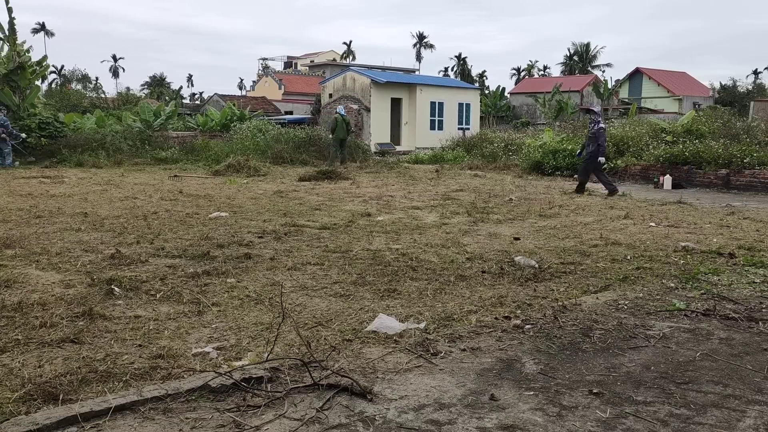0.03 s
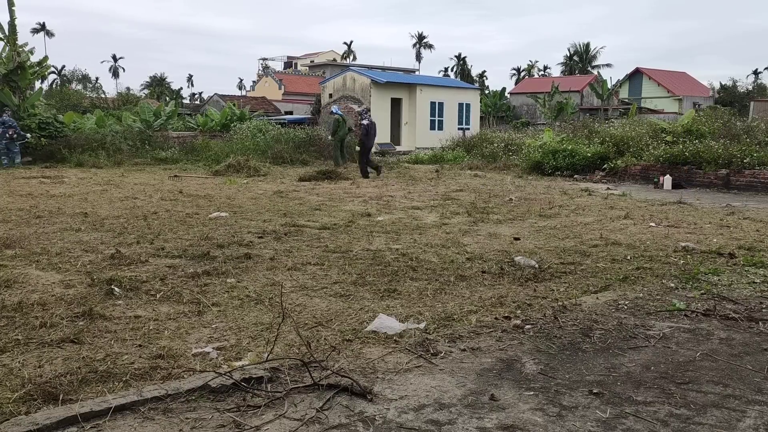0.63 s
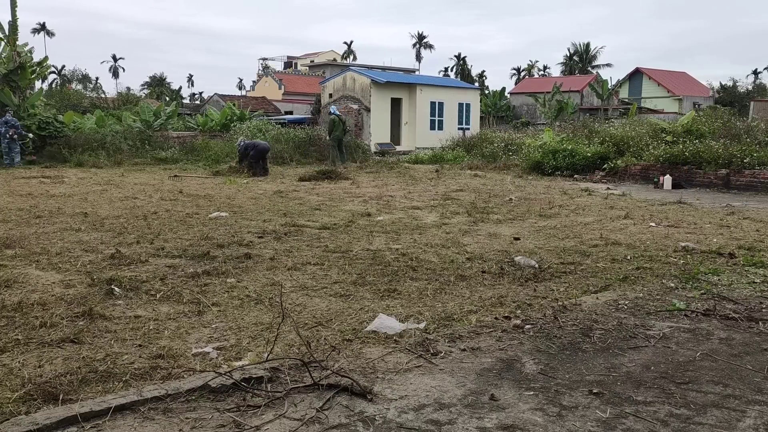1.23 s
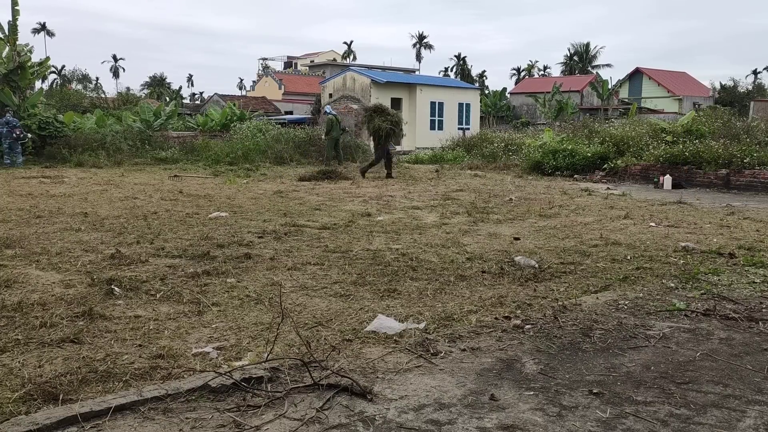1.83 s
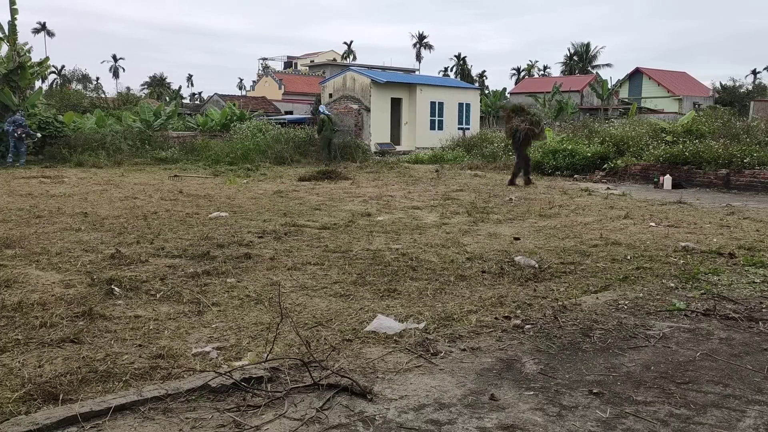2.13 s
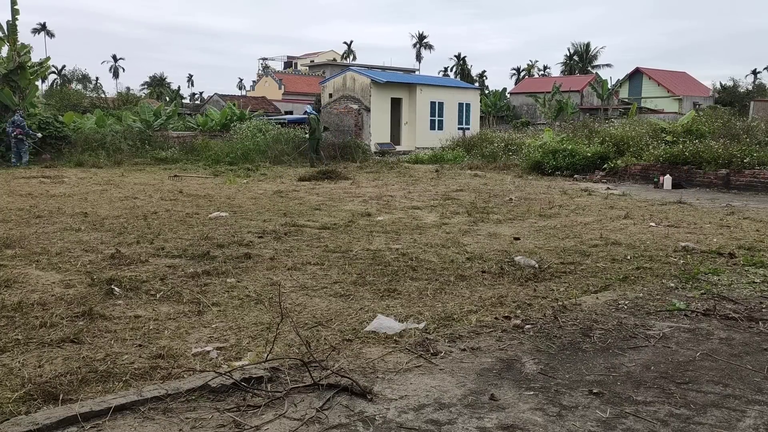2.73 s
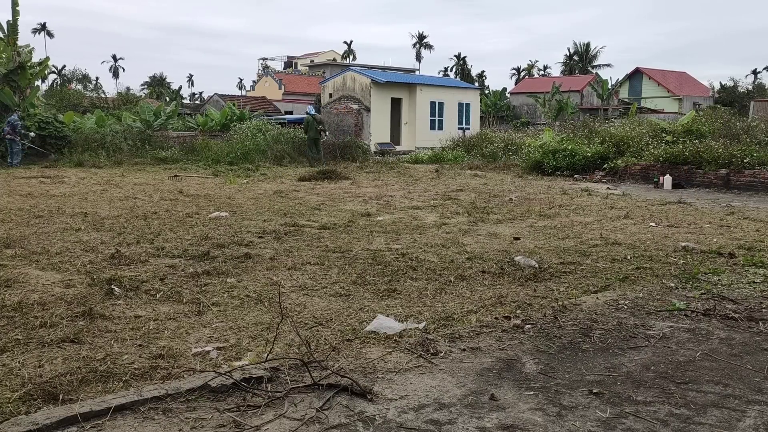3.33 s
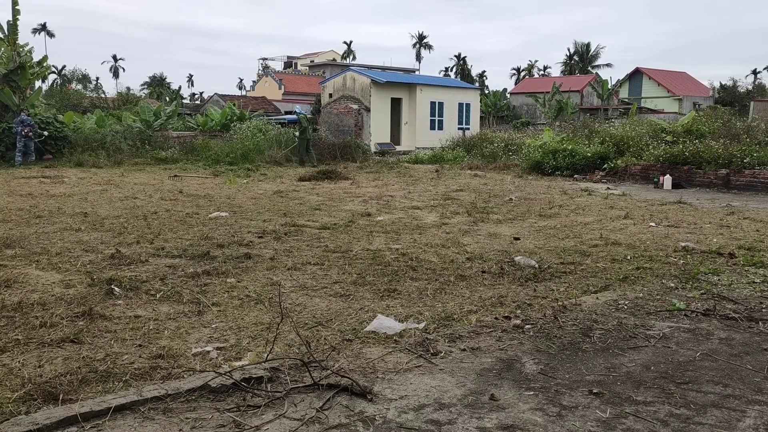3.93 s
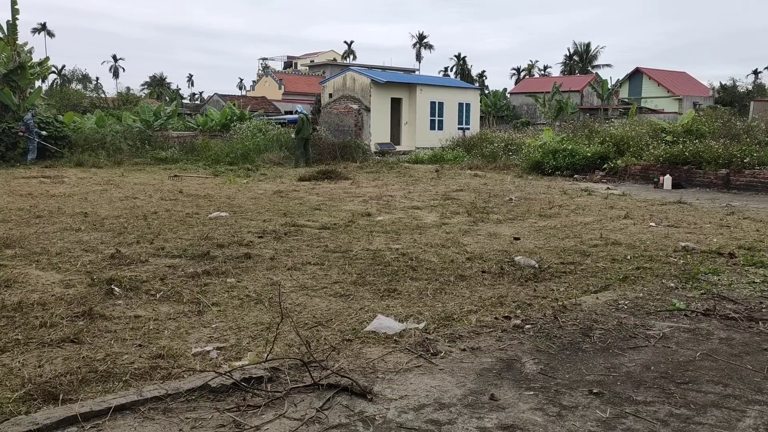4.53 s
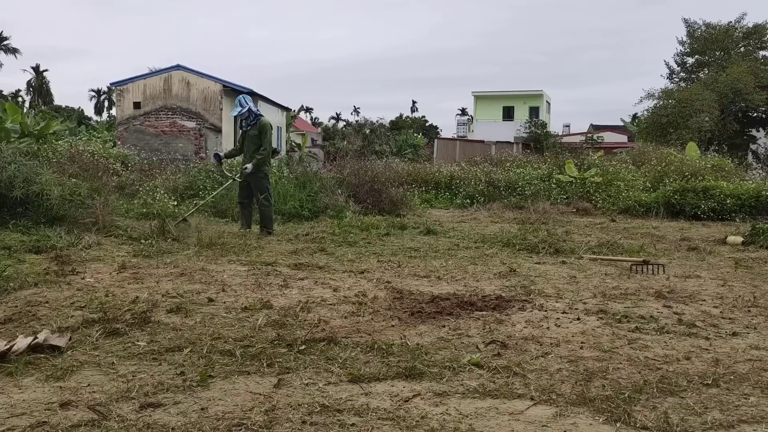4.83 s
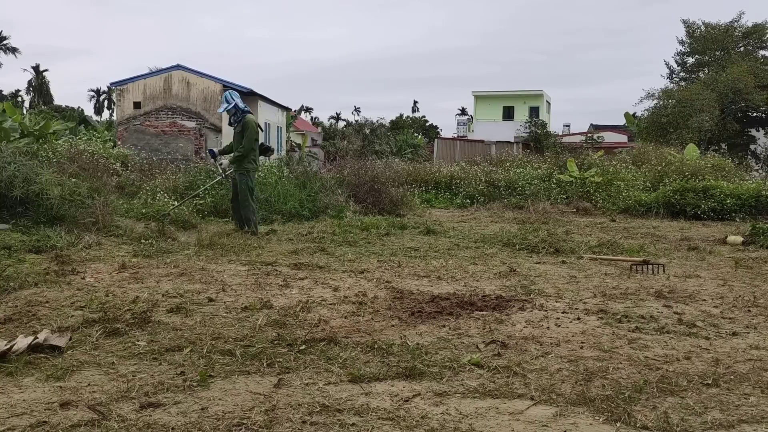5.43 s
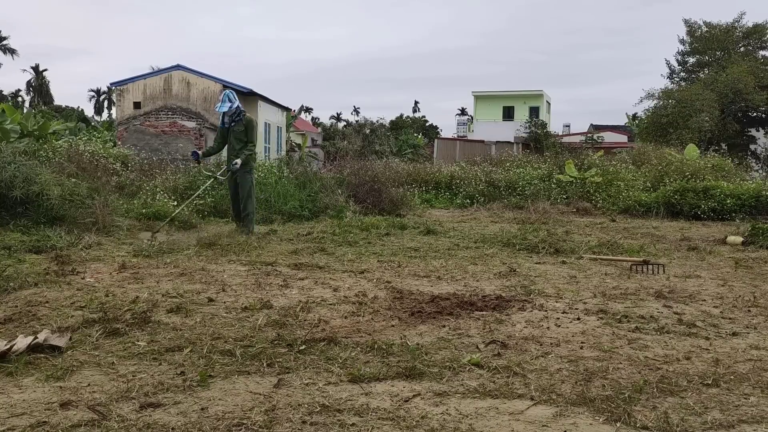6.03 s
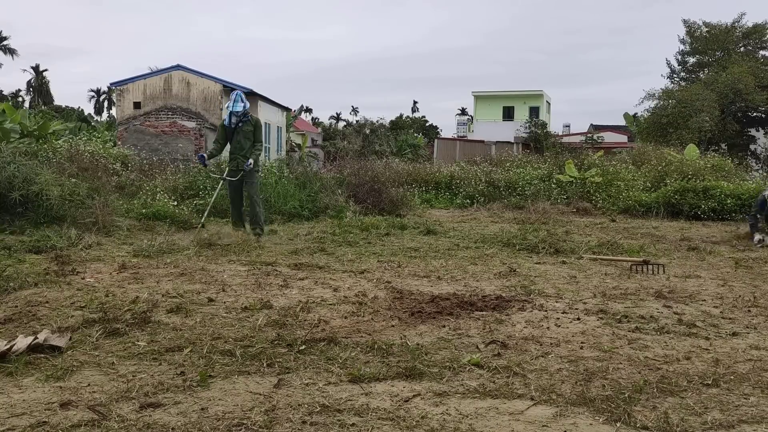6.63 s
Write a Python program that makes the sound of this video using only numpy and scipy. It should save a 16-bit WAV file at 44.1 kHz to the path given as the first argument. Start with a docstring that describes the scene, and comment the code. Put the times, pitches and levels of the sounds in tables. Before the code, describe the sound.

On an open outdoor lot, several petrol brush cutters whine at a distance, one sagging in pitch as it bites into grass, another revving in short blips. Grass swishes under a fine hiss, and light wind bumps the microphone. About two thirds through, a close engine buzz cuts in, loud and bright, then fades to a muffled drone and steps up into a higher, wavering whine.

```python
"""Petrol brush cutters work through tall grass on an open lot, each a train of firing pulses filtered by
resonances. One bogs down whenever its blade bites; another is blipped up for every sweep; two more run
far away. Later the listener stands by a close engine buzz, loud and bright at first, soon sounding
muffled; its low drone gives way to a higher, wavering engine whine, and a distant whine comes in blips.
Grass swishes, a fine hiss lies over all, wind bumps the microphone; there is a knock and a tiny squeak."""
import sys
import numpy as np
from scipy import signal
from scipy.fft import rfft, irfft
from scipy.io import wavfile
from scipy.ndimage import uniform_filter1d, map_coordinates

SR = 44100
rng = np.random.default_rng(int(sys.argv[2]) if len(sys.argv) > 2 else 0)


def file_out(sig):
    """Save sig as 16-bit WAV at sys.argv[1]."""
    # one column per channel
    cols = np.atleast_2d(sig).T
    # limit, then scale
    lim = np.clip(cols, -1, 1)
    pcm = np.round(lim * 32767).astype(np.int16)
    wavfile.write(sys.argv[1], SR, pcm)


N = 294588
TIME = np.arange(N) / SR
FREQS = np.fft.rfftfreq(N, 1 / SR)
MOVE_S = 4.714   # from here on the listener stands by the close engine buzz

# spectrum of the hiss and gas noise at the second spot: (frequency [Hz], relative density [dB])
NEAR_HISS_SPECTRUM = [(1000, -16.5), (3500, -3), (5200, -4.5), (7000, 4.5), (8200, 1), (9500, 3),
                      (12000, 2.5), (15500, -1)]


def from_db(db):
    """Amplitude ratio: a factor of ten for every 20 dB."""
    return 10 ** (np.asarray(db) / 20)


def rms_one(x):
    """Normalisation to unit mean power."""
    return x / np.sqrt(np.mean(x ** 2) + 1e-20)


def over_time(points):
    """Linear interpolation of a table in time."""
    return np.interp(TIME, *np.transpose(points))


def over_hz(points):
    """Linear interpolation of a table in log frequency."""
    hz, value = np.transpose(points)
    return np.interp(np.log(FREQS + 1), np.log(hz), value)


def drift(rate_hz):
    """Random modulation: low-pass noise of unit rms with its corner at rate_hz."""
    pole = np.exp(-40 * np.pi * rate_hz / SR)
    white = rng.standard_normal(N // 20 + 4002)
    slow = signal.lfilter([1], [1, -2 * pole, pole * pole], white)[4000:]
    return np.interp(np.arange(N) / 20, np.arange(len(slow)), rms_one(slow))


def swell(peak_s, rise_s, fall_s):
    """Envelope of unit height, between a pointed exponential and a round Gaussian."""
    width_s = np.where(TIME < peak_s, rise_s, fall_s)
    return np.exp(-(np.abs(TIME - peak_s) / width_s) ** 1.5)


def noise(spectrum, correlation):
    """Partly coherent stereo noise: the balance of mid and side sets the left-right correlation."""
    mid, side = rfft(rng.standard_normal((2, N))) * from_db(over_hz(spectrum))
    alike = np.clip(over_hz(correlation), -.95, .95)
    pair = irfft(np.sqrt(1 + alike) * mid + np.sqrt(1 - alike) * side * [[1], [-1]], N)
    return pair / pair.mean(0).std()


def firings(rate_hz, wobble, rough, whine=()):
    """One pulse per firing gives a harmonic series; whine lifts some orders: (order, lift [dB])."""
    rate_hz = rate_hz * (1 + wobble * drift(39.97))
    half_phase = np.pi * (np.cumsum(rate_hz) / SR % 1) + 1e-9
    harmonics = np.floor(SR / 2 / rate_hz.max())
    pulses = np.sin((2 * harmonics + 1) * half_phase) / np.sin(half_phase) - 1
    for order, lift_db in whine:
        pulses += (from_db(lift_db) - 1) * 2 * np.cos(2 * order * half_phase)
    return rms_one(pulses * (1 + rough * drift(81)))


def dispersion(x, spread_s):
    """Grass and bushes spread each pulse: the group delay grows by spread_s per kHz."""
    return irfft(rfft(x) * np.exp(-1j * np.pi * spread_s * FREQS ** 2 / 1000), N)


def ground_echo(x, strength, lag_s, swing=0.24):
    """Comb filtering: the ground reflection shifts as the tool swings, so each harmonic flutters."""
    delay = SR * lag_s * np.exp(swing * drift(5))
    reflected = map_coordinates(x, [np.arange(N) - delay], order=3)
    return (x + strength * reflected) / np.hypot(1, strength)


def exhaust(pulses, response, level_db):
    """Resonance: pulses ring in exhaust and housing, a minimum-phase filter; the rms follows level_db."""
    cepstrum = irfft(np.log(from_db(over_hz(response))), N)
    causal_fold = 1 + np.sign(np.fft.fftfreq(N))
    tone = irfft(rfft(pulses) * np.exp(rfft(cepstrum * causal_fold)), N)
    running_rms = np.sqrt(uniform_filter1d(tone ** 2, SR // 30) + 1e-12)
    return from_db(level_db) * tone / running_rms


def distant_tone(rate_hz, level_db, response, wobble, flutter_db, whine=()):
    """Source and filter at a distance: an engine tone whose level flutters quickly."""
    pulses = dispersion(firings(rate_hz, wobble, rough=.05, whine=whine), spread_s=.0009)
    arriving = ground_echo(pulses, strength=0.42, lag_s=0.000689)
    return exhaust(arriving, response, level_db + flutter_db * drift(45))


def lead_cutter(treble_gain_db):
    """Load slows an engine at open throttle: each bite drags the pitch down, then it recovers."""
    # running free: (time [s], firing rate [Hz], level [dB])
    free_running = [(0.0, 419.2, -52), (0.06, 472.1, -50), (0.29, 481.9, -48.5), (0.88, 488.6, -50),
                    (1.4, 517.8, -50.0), (2.1, 482.4, -49.5), (2.8, 502.9, -51), (3.43, 523.3, -50.5),
                    (4.13, 528, -51.5), (4.42, 563.5, -49), (4.7, 484.5, -50)]
    # bites into the grass: (deepest sag [s], bogging [s], recovery [s], rate step [Hz], level step [dB])
    bites = [(0.088, 0.013, 0.043, -96, -6.5), (0.213, 0.04, 0.045, -28, -3),
             (0.334, 0.013, 0.02, -55, -2.5), (0.385, 0.031, 0.059, -97, -7),
             (0.539, 0.047, 0.103, -78, -5), (0.709, 0.00668, 0.077, -34, 0.7),
             (0.772, 0.012, 0.097, -93, -6), (0.971, 0.06, 0.038, -66, -3), (1.025, 0.051, 0.085, -120, -5),
             (1.161, 0.013, 0.093, -21, -1.3), (1.315, 0.035, 0.03, -85, 0), (1.477, 0.0151, 0.058, -36, 0),
             (1.569, 0.028, 0.08, -138, -4.5), (1.679, 0.025, 0.12, -47, -1), (1.809, 0.02, 0.042, -52, -2),
             (2.007, 0.013, 0.029, -21.5, -1.5), (2.131, 0.0078, 0.041, -88.5, -7),
             (2.264, 0.028, 0.076, -117, -8.5), (2.403, 0.00811, 0.066, -58.5, -5),
             (2.56, 0.01, 0.059, -75, -6), (2.619, 0.072, 0.042, -102, -10.5),
             (2.712, 0.01115, 0.073, -33, 2), (2.861, 0.016, 0.03, -98.5, -1),
             (2.918, 0.051, 0.083, -82, -4.4), (3.013, 0.044, 0.093, -54, -0.5),
             (3.156, 0.019, 0.062, -94, -3.5), (3.193, 0.014, 0.04, -59.5, -2.5),
             (3.246, 0.021, 0.079, -65, -3), (3.535, 0.042, 0.037, -34.5, 1.2),
             (3.689, 0.015, 0.033, -109, 0), (3.763, 0.073, 0.065, -100, -5.5),
             (3.813, 0.016, 0.044, -62.5, -1), (3.917, 0.011, 0.074, -159, -3.5),
             (4.259, 0.067, 0.097, -69, 1), (4.494, 0.041, 0.097, -90, -3.5)]
    # exhaust and housing: (frequency [Hz], gain [dB])
    response = [(400, -10.5), (465, -4.5), (530, -9.5), (900, -7), (1110, -5), (1250, -31), (1500, -20.5),
                (1780, -9), (2400, -7.5), (2850, -16), (3300, -9.5), (3700, -19.5), (4450, -18.5),
                (5200, -20), (6200, -32.5)]
    # whining harmonics: (order, lift [dB])
    whine = [(4, 7), (5, 10), (9, 5)]
    # the treble comes and goes as the machine swings round: (time [s], relative lift [dB])
    treble_lift = [(0.2, -5.5), (0.45, -0.5), (0.7, -1), (0.9, 4.5), (1.1, -0.5), (2.1, -5.5), (2.4, 1.5),
                   (4.7, 0.5)]
    times, *columns = np.transpose(free_running)
    rate_hz, level_db = (np.interp(TIME, times, column) for column in columns)
    for sag_s, bogging_s, recovery_s, step_hz, step_db in bites:
        load = swell(sag_s, bogging_s, recovery_s)
        rate_hz += step_hz * load
        level_db += step_db * load
    rate_hz *= 1 + .0045 * drift(34)   # single stems tug at the speed
    tone = distant_tone(rate_hz, level_db, response, wobble=.003, flutter_db=1.1, whine=whine)
    tone *= 1 + .13 * drift(130)   # and roughen the tone
    treble = irfft(rfft(tone) * np.interp(FREQS, [3400, 4000], [0, 1]), N)
    return tone + (from_db(over_time(treble_lift) + treble_gain_db) - 1) * treble


def blipped_engines():
    """Pitch and level modulation in short blips: the sweeping cutter, and a distant engine whine."""
    # throttle blips: (peak time [s], run-up [s], run-down [s], rate gained [Hz])
    blips = [(0.348, 0.05, 0.046, 93.5), (0.437, 0.048, 0.061, 117.6), (0.647, 0.093, 0.035, 86),
             (0.871, 0.043, 0.098, 100.5), (1.051, 0.045, 0.052, 94.4), (1.188, 0.077, 0.052, 110.1),
             (1.291, 0.045, 0.019, 57.83), (1.454, 0.042, 0.015, 55.1), (1.569, 0.072, 0.068, 79.9),
             (1.752, 0.102, 0.031, 150.7), (1.828, 0.038, 0.094, 98.7), (2.038, 0.157, 0.021, 154.2),
             (2.152, 0.07, 0.044, 104.6), (2.276, 0.061, 0.024, 121.5), (2.487, 0.065, 0.084, 131.4),
             (2.723, 0.125, 0.052, 135.9), (2.951, 0.069, 0.17, 92.9), (3.194, 0.168, 0.032, 166),
             (3.396, 0.07, 0.037, 88.7), (3.641, 0.081, 0.033, 137.8), (3.779, 0.051, 0.061, 107.5),
             (3.87, 0.055, 0.017, 115.9), (4.186, 0.105, 0.094, 189.8), (4.329, 0.06, 0.058, 130.6),
             (4.576, 0.094, 0.18, 126.6), (4.878, 0.141, 0.035, 99.2), (4.993, 0.027, 0.026, 54),
             (5.215, 0.054, 0.02, 87.6), (5.295, 0.029, 0.022, 105.1), (5.421, 0.034, 0.025, 54.07),
             (5.552, 0.034, 0.021, 59.76), (5.838, 0.028, 0.075, 70.8), (5.948, 0.06, 0.047, 99),
             (6.167, 0.07, 0.026, 125.1), (6.331, 0.105, 0.066, 65.65), (6.41, 0.052, 0.075, 64.1),
             (6.629, 0.142, 0.074, 72.8)]
    # the cutter between blips, turning to and from the listener: (time [s], level [dB])
    rest_level = [(0, -68), (0.85, -69.5), (1.2, -68), (1.75, -71), (2.2, -71.5), (3.1, -69.5),
                  (3.7, -69.5), (4.3, -67), (4.7, -69.5)]
    # its exhaust and housing: (frequency [Hz], gain [dB])
    response = [(400, -25), (560, -28.5), (730, 17.5), (900, -3), (1100, -0.5), (1280, -24), (1750, -13.5),
                (2300, -11.5), (2850, -10.5), (3200, -16), (3750, -26), (4500, -16.5), (6500, -27)]
    # the whine is loudest part of the way up a blip: (rate gained [Hz], level [dB])
    whine_level = [(0, -58), (60, -52), (110, -55), (170, -66)]
    # colour of the whine: (frequency [Hz], gain [dB])
    whine_response = [(750, 2), (1000, -2.5), (1500, -8.5), (1800, -10), (2300, -5), (2750, -11),
                      (3400, -17), (5000, -15), (7000, -20)]
    rest_hz, full_throttle_gain_hz, db_per_hz = 363.7, 110, 0.1258
    gained_hz = sum(hz * swell(s, up_s, down_s) for s, up_s, down_s, hz in blips)
    rate_hz = rest_hz + gained_hz
    sweeping_db = over_time(rest_level) + db_per_hz * np.minimum(gained_hz, full_throttle_gain_hz)
    whine_db = np.interp(gained_hz, *np.transpose(whine_level))
    sweeping = distant_tone(rate_hz, sweeping_db, response, wobble=.006, flutter_db=2.5)
    whine = distant_tone(2 * rate_hz, whine_db, whine_response, wobble=.014, flutter_db=2.5)
    return sweeping, whine


def roaming_cutter(mean_hz, swing):
    """Slow frequency modulation: a faraway engine revs at random."""
    # engine tone: (time [s], level [dB])
    level = [(0, -63), (0.4, -60), (1.8, -61), (2.8, -57.5), (3.7, -58.5), (4.7, -57), (5.6, -63.5),
             (6.68, -68)]
    # exhaust and housing: (frequency [Hz], gain [dB])
    response = [(450, -32), (900, 1.5), (1350, -57), (2000, 4.5), (2900, 9), (3700, -13), (4600, -6),
                (6500, -16.5)]
    rate_hz = mean_hz * (1 + swing * np.tanh(drift(3)))
    pulses = dispersion(firings(rate_hz, wobble=.006, rough=.05), spread_s=.0013)
    return exhaust(ground_echo(pulses, strength=.5, lag_s=.0007), response, over_time(level))


def grass(gain_db):
    """Amplitude-modulated noise: blades thrash the stems in an uneven swish."""
    # swish: (time [s], relative level [dB])
    level = [(0, -64), (0.9, -57), (2.3, -59.5), (3.5, -65.5), (4.05, -59), (4.25, -54), (4.45, -58),
             (6.68, -60)]
    # its spectrum: (frequency [Hz], relative density [dB])
    spectrum = [(60, -28), (200, -13.5), (500, -5.5), (900, -2), (1350, -4), (2300, 3), (3300, -14.5),
                (8000, -18)]
    envelope = from_db(over_time(level) + gain_db + drift(20))
    return envelope * noise(spectrum, correlation=[(300, 0.81), (3000, 0.4)])


def hiss():
    """Broadband noise: a nearly steady hiss at the first spot, a wavering one at the second."""
    # first spot: (frequency [Hz], relative density [dB])
    far_spectrum = [(100, -53), (1500, -33), (3500, 1), (5200, -8), (7000, -9), (8500, -10), (9500, -4.5),
                    (12600, -1), (14500, 0.5)]
    # left-right likeness at each spot: (frequency [Hz], correlation)
    far_correlation = [(1500, -0.86), (5000, -0.72), (15000, -0.1)]
    near_correlation = [(3000, 0.7), (6800, -0.036), (14000, -0.24)]
    # second spot: (time [s], level [dB])
    near_level = [(4.72, -45), (4.86, -42.5), (5.0, -50), (5.2, -53.5), (5.65, -56.5), (6.1, -54),
                  (6.68, -55)]
    far = from_db(-56 + .5 * drift(30)) * noise(far_spectrum, far_correlation)
    near = from_db(over_time(near_level) + drift(33)) * noise(NEAR_HISS_SPECTRUM, near_correlation)
    return far, near


def wind(gain_db, lumps_db, right_db):
    """Turbulent pressure on the microphone: a lumpy rumble in gusts, mostly at the left port."""
    # gusts: (peak time [s], rise and fall [s], relative level [dB])
    gusts = [(0.05, 0.018, -71.5), (0.308, 0.032, -61.5), (0.642, 0.027, -76), (1.014, 0.36, -79),
             (1.781, 0.44, -84.5), (2.883, .11, -81.5), (4.144, 0.18, -77.5), (4.95, 0.21, -78.5),
             (5.702, 0.052, -75), (6.249, 0.19, -70), (6.495, .018, -64.5)]
    # rumble: (frequency [Hz], relative density [dB])
    spectrum = [(20, -8), (50, -1.5), (130, -1.5), (250, -1.5), (500, -4), (1200, -9.5), (3000, -27)]
    calm = from_db(-104)
    pressure = calm + sum(from_db(db) * swell(s, width_s, width_s) for s, width_s, db in gusts)
    lumps = from_db(lumps_db * np.array([drift(38), drift(6.5)]))
    rumble = noise(spectrum, correlation=[(100, 0.01)])
    return from_db(gain_db) * pressure * lumps * rumble * from_db([[0], [right_db]])


def knock(gain_db, decay_s, right_db):
    """Damped impacts: a few quick contacts, each a dull burst that decays exponentially."""
    # contacts: (time [s], relative level [dB])
    contacts = [(0.290, -53), (0.297, -46), (0.314, -46)]
    # each burst: (frequency [Hz], relative density [dB])
    spectrum = [(40, -6), (170, 1), (330, 2), (520, -6), (1200, -11), (1800, -14), (3500, -30)]
    envelope = sum(from_db(db) * (TIME >= s) * np.exp(-np.abs(TIME - s) / decay_s) for s, db in contacts)
    thud = noise(spectrum, correlation=[(300, 0.41)])
    return from_db(gain_db) * envelope * thud * from_db([[0], [right_db]])


def farthest_cutter(fourth_db):
    """Attenuation with distance: only a few low harmonics carry this far, and only in swells."""
    # engine speed: (time [s], firing rate [Hz])
    speed = [(1.0, 272), (1.3, 261.7), (2.1, 342.9), (2.46, 337.7), (4.2, 337.9), (4.28, 323.1),
             (4.7, 319.6)]
    # swells: (peak time [s], rise [s], fall [s], fundamental level [dB], octave level [dB])
    swells = [(1.05, 0.1, 0.13, -86, -70.5), (2.459, .1, 0.15, -62.5, -63.5), (4.21, 0.039, 0.1, -84, -53),
              (4.58, 0.16, 0.11, -85, -69)]
    rate_hz = over_time(speed) * (1 + 0.00597 * drift(23.3))
    phase = 2 * np.pi * np.cumsum(rate_hz) / SR
    fundamental, octave, fourth = np.sqrt(2) * np.sin([phase, 2 * phase, 4 * phase])
    upper = from_db(2.5 * drift(25)) * (octave + from_db(fourth_db) * fourth)
    return sum(swell(s, rise_s, fall_s) * (from_db(low_db) * fundamental + from_db(octave_db) * upper)
               for s, rise_s, fall_s, low_db, octave_db in swells)


def squeak(peak_s, pitch_hz, level_db, width_s, overtone_db):
    """A tone burst: three harmonics under a very short Gaussian envelope."""
    phase = 2 * np.pi * np.cumsum(pitch_hz * (1 + 0.0042 * drift(114.3))) / SR
    tone = sum(from_db(overtone_db * k) * np.sin((k + 1) * phase) for k in range(3))
    return from_db(level_db) * np.exp(-((TIME - peak_s) / width_s) ** 2) * rms_one(tone)


def close_buzz(gain_db, bright_gain_db, spit_db, treble_db, treble_s):
    """Filtered pulse trains: a low engine drone, bright at first, soon muffled; then a higher whine."""
    # the steady drone, then the wavering whine: (time [s], firing rate [Hz])
    pitch = [(4.72, 300.3), (4.836, 293), (4.854, 309), (5.124, 296.9), (5.135, 290.6), (5.25, 299),
             (5.278, 303.5), (5.302, 289.8), (5.424, 300.3), (5.495, 290.2), (5.53, 298.8), (5.696, 290.1),
             (5.726, 319.7), (5.756, 290.7), (5.778, 343.7), (5.81, 355.4), (5.888, 359.8), (5.96, 373),
             (6.018, 350.8), (6.046, 365.3), (6.084, 409.5), (6.106, 384.4), (6.138, 411.6), (6.16, 388.4),
             (6.195, 410.8), (6.248, 390.2), (6.314, 428.3), (6.356, 390), (6.406, 408.4), (6.444, 396.8),
             (6.476, 418.4), (6.504, 358.3), (6.538, 354.5), (6.624, 381.3), (6.652, 363.4), (6.68, 388)]
    # drone and whine, and the bright opening: (time [s], relative level [dB])
    tone_level = [(4.72, -48.5), (4.87, -47), (5.04, -51.5), (5.3, -54), (5.55, -57.5), (5.74, -59),
                  (5.8, -54.5), (6.68, -54)]
    bright_level = [(4.71, -41.5), (4.8, -40.5), (4.88, -40), (4.95, -43.5), (5.03, -47.5), (5.12, -55.5),
                    (5.4, -96)]
    # colours of the bright opening, the drone and the whine: (frequency [Hz], gain [dB])
    bright_response = [(290, -8.5), (600, -23.5), (1100, -7), (1750, 6.5), (2100, 4.5), (2400, 4),
                       (2950, -2), (3300, -3), (3850, -4.5), (4400, -5), (5200, -18), (7200, -20),
                       (8100, -28), (9100, 0), (11500, -23), (15000, -2.5)]
    drone_response = [(290, -15), (400, -21), (600, 5.5), (900, -0.5), (1200, -7), (1500, 10), (1950, 2.5),
                      (2200, -19), (2500, -13), (3100, -29), (3600, -27), (6000, -21)]
    whine_response = [(400, -7.5), (780, -0.5), (1150, -12.5), (1450, 6), (1650, -11), (1800, -2),
                      (2100, -15), (2350, -27), (2900, -3), (3300, -11), (3700, -35), (6000, -14)]
    # lifted harmonic of the whine: (order, lift [dB])
    lifted = [(5, 13)]
    rate_hz = over_time(pitch) * (1 + 0.001043 * drift(11))
    tone_db = over_time(tone_level) + gain_db + .9 * drift(28)
    bright_db = over_time(bright_level)
    pulses = firings(rate_hz, wobble=.003, rough=.1)
    puff_decay_s = .0007   # each firing spits gas noise
    puffs = rms_one(signal.lfilter([1], [1, -np.exp(-1 / (puff_decay_s * SR))], pulses ** 2))
    spit = from_db(bright_db + spit_db) * puffs * noise(NEAR_HISS_SPECTRUM, correlation=[(3000, 0.28)])
    bright_pulses = ground_echo(pulses, strength=0.36, lag_s=0.00116, swing=0.036)
    bright = exhaust(bright_pulses, bright_response, bright_db + bright_gain_db)
    # the treble is louder for the first instant
    treble = signal.sosfilt(signal.butter(1, [2700, 3700], "band", fs=SR, output="sos"), bright)
    bright += from_db(treble_db) * swell(MOVE_S, treble_s, treble_s) * treble
    drone = exhaust(ground_echo(pulses, strength=.2, lag_s=.0009), drone_response, tone_db)
    whine = exhaust(firings(rate_hz, wobble=0.00597, rough=0.056, whine=lifted), whine_response, tone_db)
    whine_share = np.interp(rate_hz, [312, 345], [0, 1])
    tone = (1 - whine_share) * drone + whine_share * whine + bright
    return scatter(tone, scatter_db=-7, decay_s=0.12) + spit


def scatter(x, scatter_db, decay_s, count=40):
    """Scattering: bushes and walls add faint echoes to the direct sound, different on each side."""
    pair = []
    for lags_s, sizes in zip(rng.uniform(0.001951, .11, (2, count)), rng.standard_normal((2, count))):
        echoes = np.zeros(SR // 2)
        echoes[(lags_s * SR).astype(int)] = sizes * np.exp(-lags_s / decay_s)
        scattered = signal.fftconvolve(x, echoes / np.linalg.norm(echoes))[:N]
        pair.append(x + from_db(scatter_db) * scattered)
    return np.array(pair)


def ports(pair, left_phase):
    """Directional cues: low tones are louder at the left microphone port; phase depends on bearing."""
    # port balance: (frequency [Hz], left minus right [dB])
    balance = [(200, 6.5), (400, 5.5), (700, 4.5), (1300, -1), (3000, -1)]
    half = from_db(over_hz(balance) / 2) * np.exp(.5j * over_hz(left_phase))
    return irfft(rfft(pair) * [half, 1 / half], N)


def scene():
    """Superposition at two spots: first far from every cutter, then beside a close engine."""
    # phase between the ports at each spot: (frequency [Hz], left minus right [rad])
    far_phase = [(300, -1.0), (900, -0.55), (2200, 0.15), (4000, 0.3)]
    near_phase = [(300, -1.1), (2000, -0.3), (4500, -0.4), (8500, -2.4), (15000, -3.6)]
    moved = np.clip((TIME - MOVE_S) / 0.0069, 0, 1)
    lead = lead_cutter(treble_gain_db=0.7)
    sweeping, distant_whine = blipped_engines()
    roaming = roaming_cutter(mean_hz=452.4, swing=.16)
    farthest = farthest_cutter(fourth_db=-6.5)
    distant = (1 - moved) * (lead + sweeping + farthest) + moved * distant_whine + roaming
    distant += squeak(peak_s=1.862, pitch_hz=3520, level_db=-45.5, width_s=0.0057, overtone_db=-5)
    distant = scatter(distant, scatter_db=-13, decay_s=0.0034) + grass(gain_db=-4.5)
    near = close_buzz(gain_db=3, bright_gain_db=1.5, spit_db=-8.5, treble_db=9, treble_s=0.026)
    far_hiss, near_hiss = hiss()
    first_spot = ports(distant, far_phase) + far_hiss
    second_spot = ports(distant + near, near_phase) + near_hiss
    rumble = wind(gain_db=10, lumps_db=5.5, right_db=-10.5)
    clatter = knock(gain_db=-0.5, decay_s=0.017, right_db=-13)
    return (1 - moved) * first_spot + moved * second_spot + rumble + clatter


def record(dry):
    """Band limiting: a steep elliptic low-pass removes the highest treble."""
    cutoff_hz = 15800
    return signal.sosfilt(signal.ellip(12, .1, 70, cutoff_hz, fs=SR, output="sos"), dry)


dry = scene()
out = record(dry)
file_out(out)
```